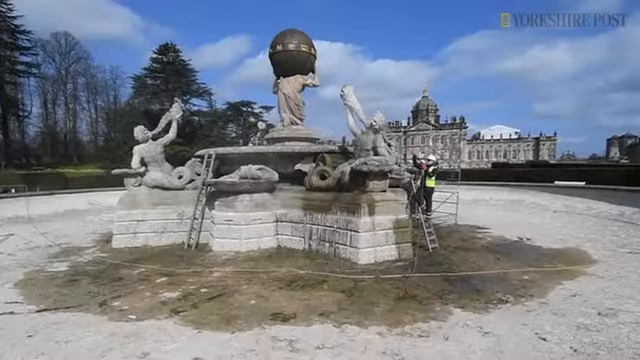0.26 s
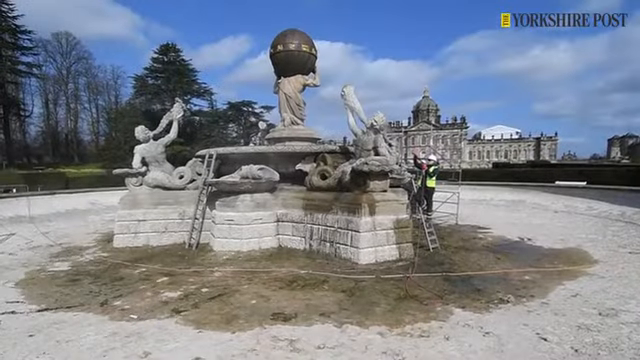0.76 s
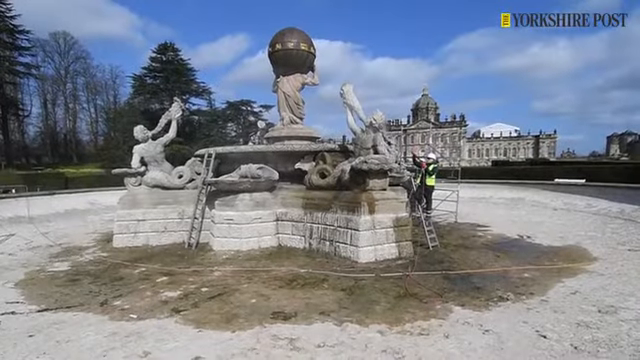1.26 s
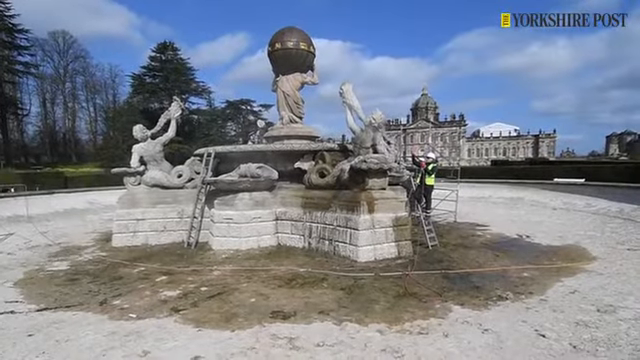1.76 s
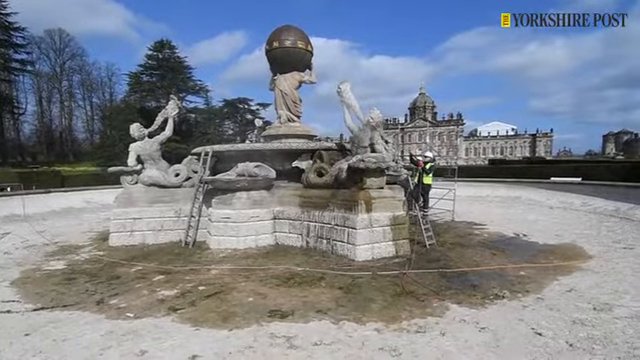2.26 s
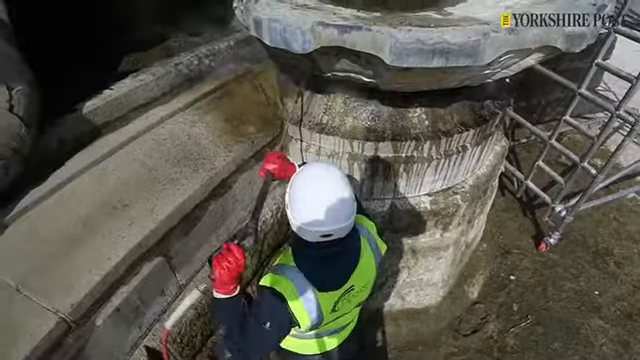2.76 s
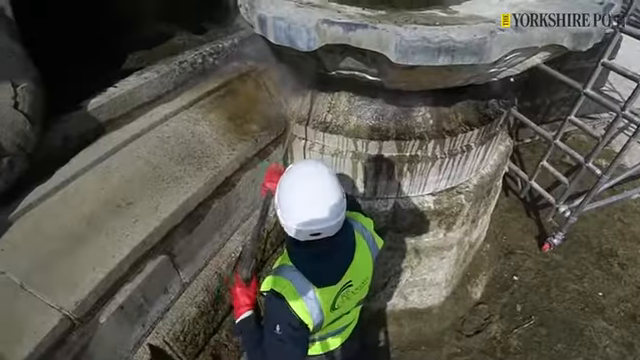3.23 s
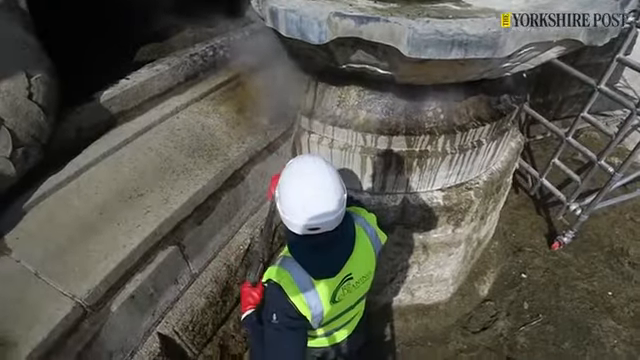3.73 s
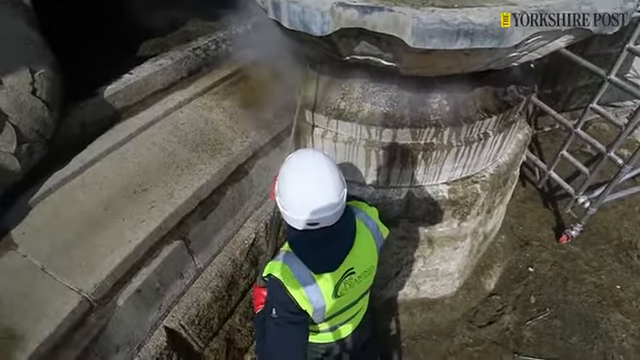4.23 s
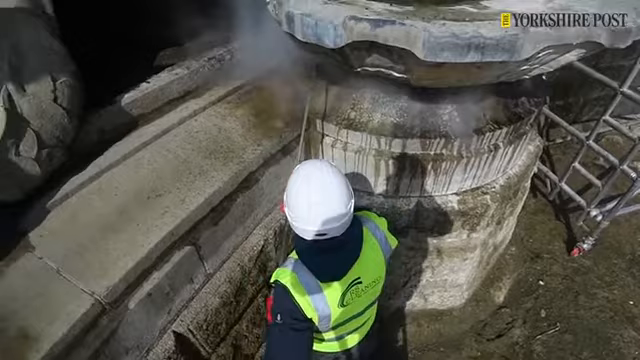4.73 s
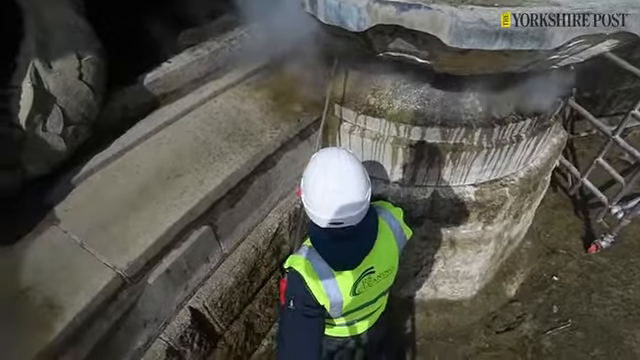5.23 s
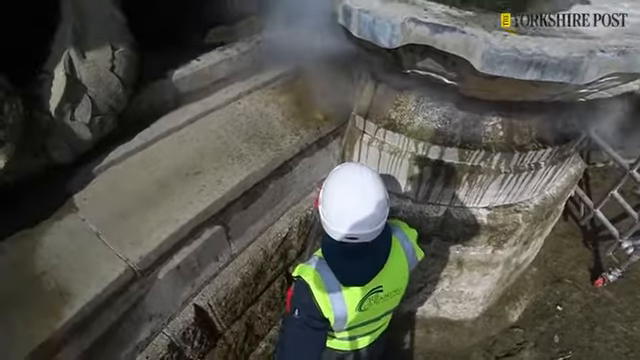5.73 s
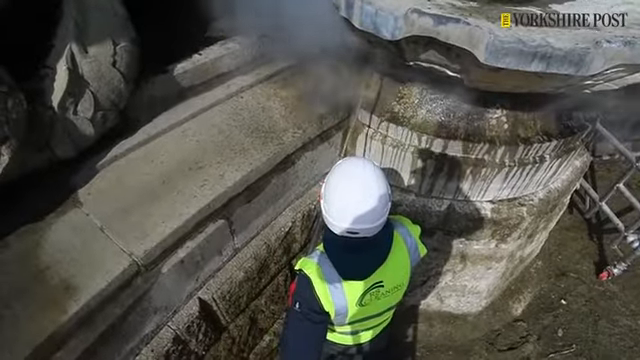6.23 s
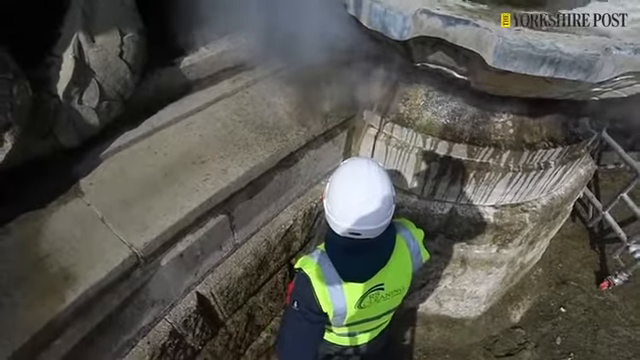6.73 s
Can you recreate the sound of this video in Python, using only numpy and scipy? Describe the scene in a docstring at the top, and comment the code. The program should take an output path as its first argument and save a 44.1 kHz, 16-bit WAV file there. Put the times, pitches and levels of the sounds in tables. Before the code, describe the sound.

Outdoors, a steam lance hisses thinly in the distance over a chugging engine and low rumble, with one dry tick and a few dull bumps. After about two seconds the jet is suddenly close, roaring and hissing on stone with brief ringing tones. Its spray sizzles brightly in repeated flares as the lance sweeps to and fro, spluttering now and then, while the machine hums behind it.

```python
"""A thin, distant hiss over a chugging engine, with one dry tick: a steam lance cleans a stone fountain.
From about 2.3 s the jet is close: it roars on the stone and in a corner, rings briefly now and then,
and its spray sizzles brightly as the lance is swept to and fro. The machine's pump and burner hum
behind it. A few dull bumps and splutters come in between."""
import sys
import numpy as np
from scipy import signal
from scipy.fft import rfft, irfft, next_fast_len
from scipy.io import wavfile
from scipy.ndimage import uniform_filter1d, map_coordinates

SR = 44100
rng = np.random.default_rng(int(sys.argv[2]) if len(sys.argv) > 2 else 0)


def master_out(mix):
    """Clip the mix to full scale and print it as 16-bit PCM to the path in sys.argv[1]."""
    frames = np.transpose(np.atleast_2d(mix))
    ceiling = np.clip(frames, -1, 1)
    pcm = np.round(ceiling * 32767).astype(np.int16)
    wavfile.write(sys.argv[1], SR, pcm)


N = 307950
TIME = np.arange(N) / SR
FFT_SIZE = next_fast_len(N, real=True)
FREQ_HZ = np.maximum(np.arange(FFT_SIZE // 2 + 1) * SR / FFT_SIZE, 1)


def jet():
    """Close steam jet on stone; at each pass sizzle and hiss flare and the roar gives way."""
    # Jet strength. Each row: time in seconds, level in dB.
    jet_level = [(2.3, -45), (2.42, -37.3), (2.6, -29), (2.8, -25), (3.02, -24.5), (3.2, -22.3),
                 (3.6, -22.5), (4.3, -22.5), (5.5, -22.5), (6.98, -21.5)]
    # Lance passes. Each row: centre in seconds, sizzle in dB re the jet, sigma in seconds.
    passes = [(3.256, -3, 0.017), (3.327, -4.5, 0.01), (3.372, -3, 0.0079), (3.417, -4, 0.013),
              (4.547, -5, 0.042), (4.81, -7, 0.026), (5.11, -10, 0.036), (5.4, -1, 0.042),
              (5.683, -3, 0.034), (5.995, -2.5, 0.05), (6.287, -.5, 0.049), (6.537, -1, 0.028),
              (6.665, -0.5, 0.027), (6.738, -3, 0.014), (6.827, -0.5, 0.032), (6.929, -1.5, 0.026)]
    # Reflections off nearby stone. Each row: delay in seconds, gain in dB.
    walls = [(.0016, -18.5), (.0037, -21), (.0058, -16), (.0076, -19.5), (0.0112, -14)]
    jet_db, sag_db = curve(jet_level), slips()
    stone_db = jet_db + sag_db
    flare = sum(undb(db) * swell(at_s, sigma_s) for at_s, db, sigma_s in passes)
    steam = corner(roar(stone_db, flare)) + hiss(stone_db, flare)
    steam += sizzle(jet_db + 0.33 * sag_db, flare)  # spray carries on, sags less
    flutter_db = 0.49 * walk(40)  # wet steam comes unevenly
    steam = echoes(steam, walls, sway_s=0.00013)
    return ramp(2.33, 2.37) * undb(flutter_db) * (steam + rings_and_swells())


def roar(level_db, flare):
    """Steam striking stone: a hollow midrange under a shifting upper band."""
    # Spectra of the two bands. Each row: frequency in Hz, density in dB.
    hollow_colour = [(300, -18), (430, -15), (535, -6.5), (620, -4.5), (725, -6), (805, -1.5), (890, -4),
                     (1010, -1.5), (1100, 0.5), (1380, 0.5), (1720, 2.5), (1950, -3), (2200, -5)]
    upper_colour = [(2150, -6.5), (2380, -3), (2600, 0), (3100, .5), (3600, 2), (4050, 2), (4450, -3.5),
                    (4720, -9)]
    hollow = noise(hollow_colour) * undb(level_db - 3.5 - 2.5 * flare + 0.98 * walk(20))
    upper = unit(shifting(noise(upper_colour), [2600, 2970, 3300, 3720, 4050], spread_db=1.1))
    upper *= undb(level_db + 0.5 - 2 * flare + 0.5 * walk(20))
    return hollow + upper


def hiss(level_db, flare):
    """Treble of the jet, roughened by droplets."""
    # Each row: frequency in Hz, density in dB.
    colour = [(4780, -4.5), (5100, -0.5), (5500, 0), (6500, 0.5), (7250, -2.5), (8100, 0.5), (9100, 0.5),
              (11500, -7.5), (15000, -22)]
    steam = noise(colour) * unit(1 + 0.44 * droplets(per_s=2500, spread_db=2.7, decay_s=0.00032))
    return steam * undb(level_db - 4.5 + 2.1 * flare + 0.5 * walk(14))


def sizzle(level_db, flare):
    """Fine spray: a slowly fading bed plus a flare at each pass."""
    # Each row: frequency in Hz, density in dB.
    colour = [(6500, -14.5), (8300, 0.5), (10500, -3), (12800, -4.5), (14200, -8.5), (15800, -10)]
    spray = noise(colour) * unit(1 + 0.32 * droplets(per_s=1500, spread_db=2.1, decay_s=0.0007))
    bed_db = -11.5 - 0.6 * (TIME - 4.6)
    return spray * undb(level_db + 0.27 * walk(9.9)) * np.hypot(undb(bed_db), flare)


def slips(edge_s=0.021):
    """Sag in dB while the jet is off the stone: quick fall, hold, quick return."""
    # Each row: centre in seconds, depth in dB, length in seconds.
    sags = [(3.337, -5.5, 0.15), (6.603, -7, 0.1), (6.877, -7.5, 0.086)]
    return sum(db * 0.5 * (1 + np.tanh((length_s / 2 - np.abs(TIME - at_s)) / edge_s))
               for at_s, db, length_s in sags)


def corner(x, depth=0.55):
    """One band of the roar partly cancels while the lance points into the corner."""
    return x - depth * swell(3.52, sigma_s=0.18) * ring(x, 2340, width_hz=300)


def rings_and_swells():
    """Brief rings in the jet, plus a broad swell of hiss and two soft swells of low roar; all waver."""
    # Each row: centre in seconds, frequency in Hz, bandwidth in Hz, level in dB, sigma in seconds.
    bands = [(2.573, 3420, 300, -35, .1), (3.06, 730, 220, -36, 0.11), (3.08, 1095, 132, -32, 0.13),
             (3.192, 1610, 230, -30.5, .05), (3.02, 3740, 120, -32, .045), (3.16, 3380, 200, -32, .05),
             (3.192, 3850, 130, -28.5, .045), (3.55, 3350, 140, -26.5, 0.14), (3.53, 3880, 220, -29, 0.11),
             (3.62, 2720, 140, -36, .12), (3.7, 1660, 220, -35.5, 0.25), (3.8, 6500, 1100, -33.5, 0.58),
             (3.873, 3950, 180, -27, 0.055), (4.787, 2540, 150, -28, 0.035), (5.38, 1785, 55, -31.5, 0.47),
             (5.79, 3940, 220, -33, .07), (6.4, 640, 300, -37, 0.22), (6.352, 1190, 220, -35, 0.45),
             (6.427, 3910, 160, -26, 0.051), (6.435, 3680, 140, -27, .045),
             (6.745, 2680, 400, -28.5, 0.029), (6.76, 3720, 700, -24.5, 0.029),
             (6.72, 3880, 260, -33, 0.16)]
    swells = sum(noise_band(hz, width_hz) * undb(db) * swell(at_s, sigma_s)
                 for at_s, hz, width_hz, db, sigma_s in bands)
    pitch_ratio = 1 + 0.006 * walk(4)
    return map_coordinates(swells, [np.cumsum(pitch_ratio)], mode="mirror")


def distant():
    """Far hiss, engine and outdoor rumble; all fade as the close jet takes over."""
    # Each row: frequency in Hz, density in dB.
    rumble_colour = [(20, -24), (45, -9), (66, 1.5), (95, -0.5), (125, -8), (250, -16.5), (400, -15)]
    steam = far_hiss()
    rumble = noise(rumble_colour) * undb(-44 + 1.1 * walk(6.9))
    return (steam + (engine() + rumble) * undb(1.5)) * (1 - ramp(2.6, 2.98))


def far_hiss():
    """The jet from across the basin, with its ground reflection."""
    # Each row: frequency in Hz, density in dB.
    colour = [(300, -20), (620, -6), (750, -4), (900, -8), (1900, -5), (3200, -8), (4500, -7), (6000, -9),
              (8000, -12.5), (11000, -9.5), (13000, -9.5), (15800, -14.5)]
    steam = shifting(noise(colour), [1500, 2000, 2700, 3400, 4200], spread_db=1.0)
    middle = signal.sosfiltfilt(signal.butter(2, 5500, fs=SR, output="sos"), steam)
    treble = steam - middle
    # Moving air swells the two bands separately.
    steam = middle * undb(0.8 * walk(7.04)) + treble * undb(0.59 * walk(8.9))
    level_db = -40.5 + 3 * ramp(0, 0.32)
    return echoes(steam, [(0.0041, -8.5), (0.0049, -26)], sway_s=0.00005) * undb(level_db)


def engine(firing_hz=27.76, echo_s=0.01068):
    """One slow cylinder: each firing gives a puff, its inverted echo and the same casing rattle."""
    # Exhaust resonances. Each row: frequency in Hz, bandwidth in Hz, gain in dB.
    exhaust_modes = [(133, 74, 0.5), (113, 12, -7), (166, 11, -9.5), (221.5, 9.1, -10), (305, 23, -20)]
    count = int(N / SR * firing_hz)
    time_jitter, level_jitter = rng.standard_normal((count, 2)).T
    firings_s = 0.0128 + np.arange(count) / firing_hz + 0.00008 * time_jitter
    pulses = np.zeros(N)
    pulses[np.clip((firings_s * SR).astype(int), 0, N - 1)] = undb(1.1 * level_jitter)
    puffs = sum(undb(db) * ring(pulses, hz, width_hz) for hz, width_hz, db in exhaust_modes)
    puffs = ring(puffs, 129, width_hz=101)  # silencer rounds each puff
    exhaust = puffs - undb(-4) * np.interp(TIME - echo_s, TIME, puffs)
    casing = noise([(400, -17), (580, -8.5), (760, 1.5), (1100, -2), (2000, -9), (4500, -12)])
    rattle = signal.fftconvolve(pulses, casing[:int(SR / firing_hz)])[:N]
    return undb(-38.5) * unit(exhaust) + undb(-51) * unit(rattle)


def machine():
    """Pump and burner, humming behind the close jet."""
    # Each row: frequency in Hz, level in dB before the machine gain.
    hum_tones = [(140, -55.5), (161.5, -48.5), (242.2, -51.5)]
    # Each row: time in seconds, gain in dB.
    machine_gain = [(3.0, 4), (4.5, -1), (6.98, 1)]
    # Each row: frequency in Hz, density in dB.
    burner_colour = [(20, -20), (48, -13), (70, 3), (105, -7.5), (170, 0.5), (250, -3.5), (340, -5.5),
                     (500, -8)]
    hum = np.zeros(N)
    for hz, db in hum_tones:
        amplitude = np.sqrt(2) * undb(db + 1.4 * walk(5.6))
        pitch_hz = hz * (1 + 0.00283 * walk(5.5))
        hum += amplitude * np.sin(2 * np.pi * np.cumsum(pitch_hz) / SR)
    burner = noise(burner_colour) * undb(-44.5 + 0.31 * walk(7))
    return (hum + burner) * undb(curve(machine_gain)) * ramp(2.25, 2.57)


def bumps():
    """Dull bumps and splutters: short swells of low noise."""
    # Each row: centre in seconds, level in dB, frequency in Hz, width in octaves, sigma in seconds.
    events = [(1.093, -34, 100, 0.94, 0.011), (1.334, -28, 65, .6, 0.009), (1.353, -34.5, 220, 0.64, 0.013),
              (1.473, -42, 268, 0.39, 0.014), (1.775, -36, 199, 0.65, 0.0098),
              (3.003, -32.5, 90, 0.31, 0.017), (3.292, -29, 201, 0.44, 0.018),
              (3.293, -25.5, 696, 0.47, 0.0083), (3.394, -28, 414, 1.3, 0.0088),
              (6.606, -35.5, 186, 0.68, 0.056), (6.631, -26, 650, 0.96, 0.022),
              (6.893, -28.5, 433, 2.1, 0.051)]
    out = np.zeros(N)
    for at_s, db, hz, octaves, sigma_s in events:
        envelope = swell(at_s, sigma_s)
        burst = envelope * noise([(hz / 4 ** octaves, -14), (hz, 0), (hz * 4 ** octaves, -20)])
        out += undb(db) * burst * np.sqrt(np.sum(envelope ** 2) / np.sum(burst ** 2))
    return out


def tick(start_s=0.1799):
    """One sharp, dry tap that dies at once."""
    # Each row: frequency in Hz, peak in dB, T60 in seconds.
    modes = [(520, -29, 0.01), (950, -28, .006), (1650, -27, .004)]
    age_s = np.maximum(TIME - start_s, 0)
    return sum(np.sin(2 * np.pi * hz * age_s) * undb(db - 60 * np.minimum(age_s / t60_s, 2))
               for hz, db, t60_s in modes)


def echoes(x, paths, sway_s):
    """Add reflections (delay in s, gain in dB); the paths sway as the lance moves."""
    out = x.copy()
    dull = signal.sosfilt(signal.butter(1, 8000, fs=SR, output="sos"), x)  # rough stone scatters treble
    for delay_s, db in paths:
        position = (TIME - delay_s - sway_s * walk(2.2)) * SR
        out += undb(db) * map_coordinates(dull, [position], order=3)
    return out / np.sqrt(1 + sum(undb(db) ** 2 for _, db in paths))


def shifting(x, centres_hz, spread_db):
    """Narrow bands swell and fade independently."""
    return x + sum((undb(spread_db * walk(5)) - 1) * ring(x, hz, width_hz=290) for hz in centres_hz)


def droplets(per_s, spread_db, decay_s):
    """Envelope of tiny, uneven impacts, rms 1."""
    hits = (rng.random(N) < per_s / SR) * undb(spread_db * np.minimum(rng.exponential(size=N), 4))
    return unit(signal.lfilter([1], [1, -np.exp(-1 / (decay_s * SR))], hits))


def noise_band(hz, width_hz):
    """Resonant noise of rms 1; two filter passes for steep skirts."""
    return unit(ring(ring(rng.standard_normal(N), hz, width_hz), hz, width_hz))


def ring(x, hz, width_hz):
    """One resonance, gain 1 at its centre."""
    return signal.lfilter(*signal.iirpeak(hz, hz / width_hz, fs=SR), x)


def noise(colour):
    """Noise of rms 1 shaped by (Hz, dB) points; falls 60 dB per octave past both ends."""
    hz, db = np.transpose(colour)
    octaves_out = np.abs(np.log2(FREQ_HZ / np.clip(FREQ_HZ, hz.min(), hz.max())))
    gain = undb(np.interp(np.log(FREQ_HZ), np.log(hz), db) - 60 * octaves_out)
    return unit(irfft(rfft(rng.standard_normal(FFT_SIZE)) * gain, FFT_SIZE)[:N])


def walk(rate_hz):
    """Smooth random drift, rms 1."""
    hold = max(int(SR / rate_hz), 1)
    steps = np.repeat(rng.standard_normal(N // hold + 1), hold)
    return unit(uniform_filter1d(uniform_filter1d(steps, hold), hold)[:N])


def swell(at_s, sigma_s):
    """Gaussian envelope, peak 1."""
    return np.exp(-0.5 * ((TIME - at_s) / sigma_s) ** 2)


def curve(points):
    """Straight lines through (s, value) points."""
    return np.interp(TIME, *np.transpose(points))


def ramp(start_s, end_s):
    """Linear rise from 0 to 1."""
    return np.clip((TIME - start_s) / (end_s - start_s), 0, 1)


def undb(db):
    """Decibels to gain."""
    return 10 ** (np.asarray(db) / 20)


def unit(x):
    """Scale to rms 1."""
    return x / np.sqrt(np.mean(x ** 2))


def scene():
    """All sources, the same on both channels."""
    return np.tile(jet() + distant() + machine() + bumps() + tick(), (2, 1))


def record(dry, cutoff_hz=15750):
    """Steep low-pass."""
    return signal.sosfilt(signal.ellip(12, 0.1, 90, cutoff_hz, fs=SR, output="sos"), dry)


dry = scene()
out = record(dry)
master_out(out)
```